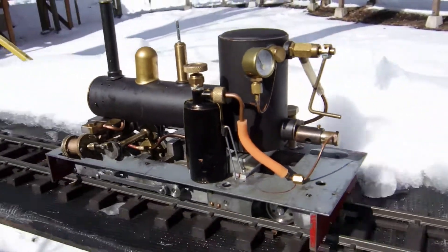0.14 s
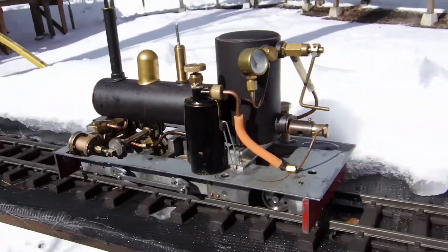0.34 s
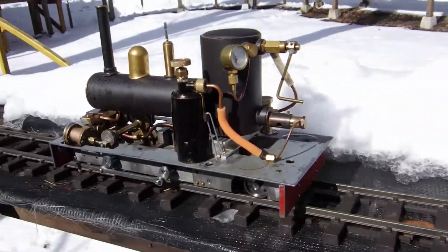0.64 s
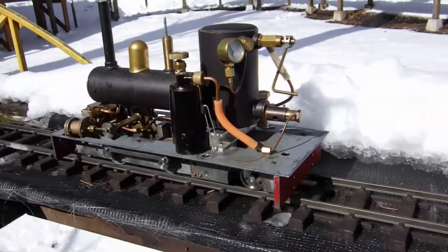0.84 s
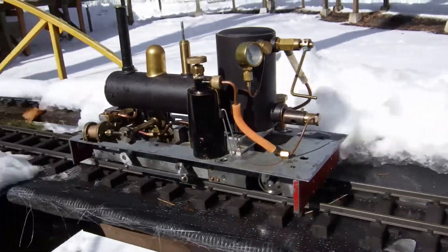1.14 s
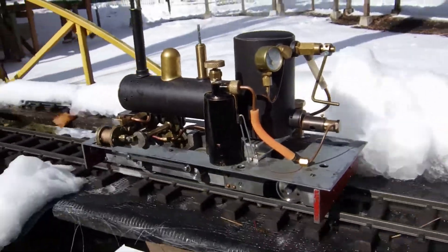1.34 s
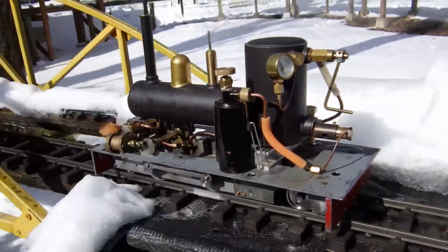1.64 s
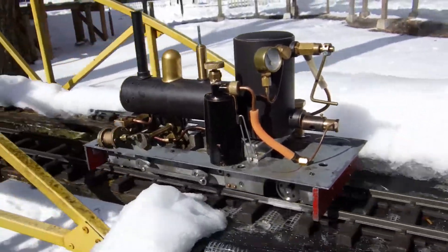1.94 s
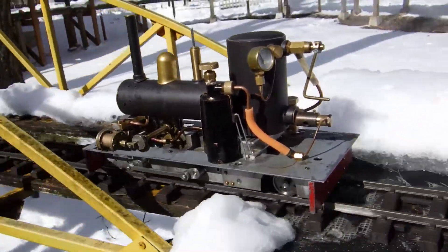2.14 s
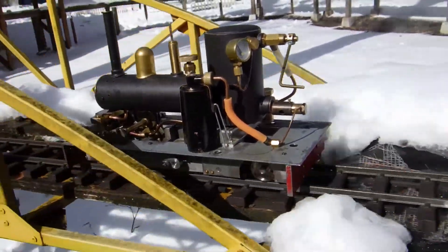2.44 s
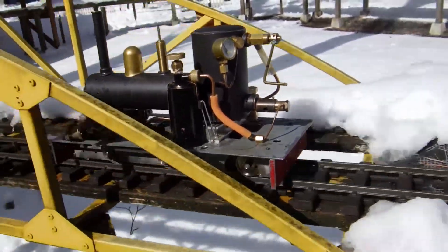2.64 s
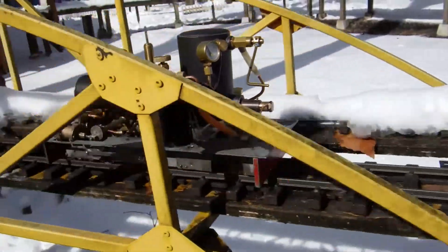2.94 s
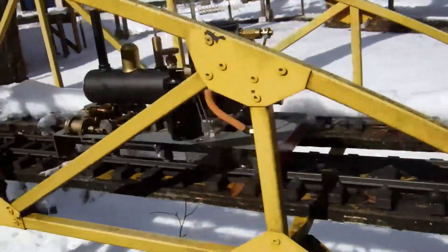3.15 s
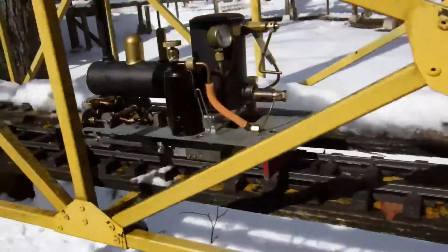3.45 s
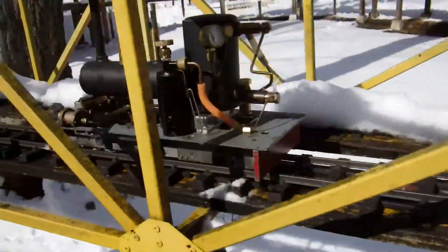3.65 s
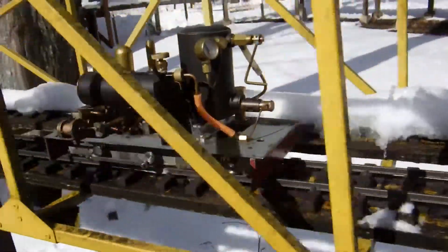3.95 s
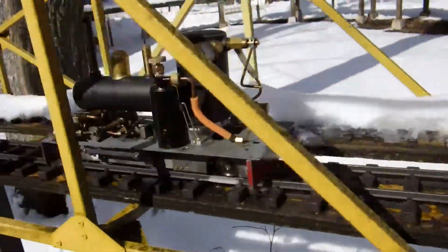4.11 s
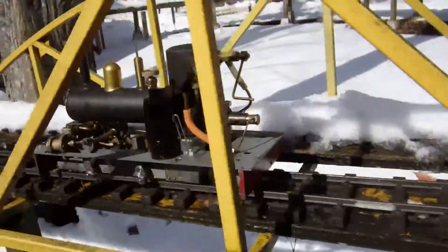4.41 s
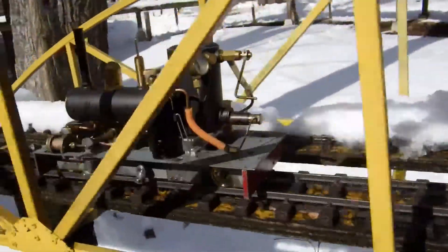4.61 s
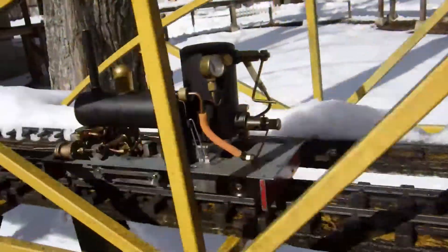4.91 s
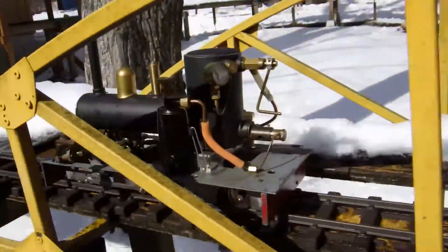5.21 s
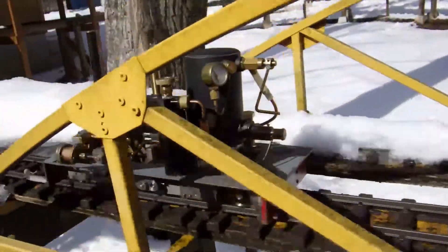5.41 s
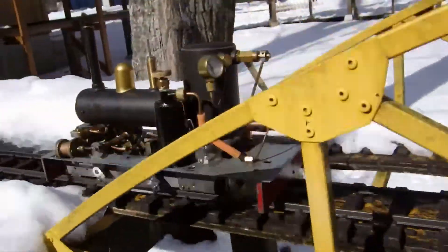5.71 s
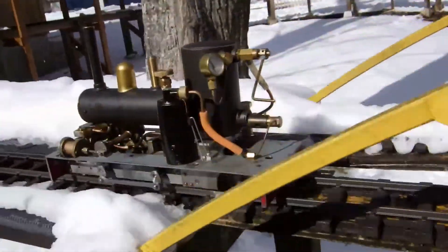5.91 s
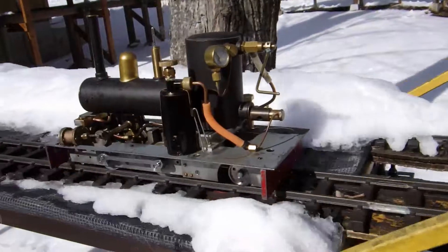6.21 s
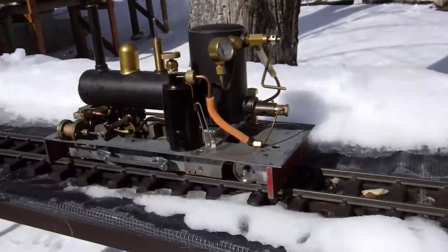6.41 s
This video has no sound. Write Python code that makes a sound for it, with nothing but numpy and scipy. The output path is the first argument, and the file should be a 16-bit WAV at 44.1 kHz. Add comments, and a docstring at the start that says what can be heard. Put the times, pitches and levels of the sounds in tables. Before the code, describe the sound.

Continuous mid-pitched roar from a small burner, blended with rolling whirr and a thin steam leak. Crisp, airy chuffs and valve wheezes form a regular rhythm that accelerates until the middle, then holds fast. Light mechanical knocks and rough creaks clatter on top. Several hard clicks snap right at the microphone, strongest late, the sound briefly dipping afterwards. Close, dry, outdoors, barely any wind; the engine never stops.

```python
"""A burner and rolling wheels roar as a small steam locomotive gathers speed, a hand-held camera close by.
Resonances shape noise into roar and hum; a valve wheezes with a sinking whistle; steam leaks steadily,
puffs once a turn and spits at two points of it. Rods knock, and the camera housing creaks and clicks as
slips and impacts set off its rings. Wind buffets faintly; the housing cuts notches in everything, and
its limiter ducks just after strong, treble-weighted peaks."""
import sys
import numpy as np
from scipy.fft import rfft, irfft, next_fast_len
from scipy.io import wavfile
from scipy.ndimage import uniform_filter1d, map_coordinates

SR = 44100
rng = np.random.default_rng(int(sys.argv[2]) if len(sys.argv) > 2 else 0)


def inscribe(sig):
    """Save sig as 16-bit PCM at rate SR to the path in sys.argv[1].

    A 1-D sig is mono; a 2-D sig holds one channel per row.
    Samples are clipped to [-1, 1] before scaling.
    """
    pcm = np.round(np.clip(np.atleast_2d(sig).T, -1, 1) * 32767)
    wavfile.write(sys.argv[1], SR, pcm.astype(np.int16))


N = 289558

# Roar levels over time: start_s [s], flue_tone_db, flame_db, wheel_whirr_db, hum_db [dB]
ROAR_LEVELS = [(0, -31, -28, -29.5, -37), (.05, -24.5, -27.5, -30.5, -39), (.6, -27.5, -26.5, -30, -39.5),
               (.8, -25, -26, -27.5, -37.5), (1.25, -26, -26, -30, -38.5), (1.5, -25, -23, -28, -34),
               (1.67, -29.5, -27, -31.5, -37.5), (1.81, -20.5, -24, -30.5, -34.5),
               (1.96, -21, -25.5, -29.5, -35.5), (2.3, -21.5, -26, -34.5, -37.5),
               (2.7, -23, -27.5, -31, -40), (3.5, -21, -26, -30.5, -38.5), (4.2, -22, -26.5, -31, -38),
               (4.55, -22.5, -27, -32, -38.5), (4.85, -20, -27, -29, -38.5), (5.3, -21.5, -26, -30, -40.5),
               (5.7, -19.5, -27.5, -30, -36), (6.2, -21.5, -24, -28.5, -37.5),
               (6.57, -22.5, -28.5, -30.5, -40)]
# Broad flame spectrum: frequency_hz [Hz], density_db [relative dB per Hz]
FLAME_SPECTRUM = [(250, -58), (500, -16), (700, -10), (1150, -14.5), (1500, -22.5), (1900, -29),
                  (3000, -43)]
# Flue resonances, before squaring: centre_hz [Hz], width_hz [Hz], level_db [relative dB]
FLUE_MODES = [(946, 69, -1), (868, 147, -1.5), (968, 297, -3.5)]
# Wheel resonances, before the power 1.52: centre_hz [Hz], width_hz [Hz], level_db [relative dB]
WHIRR_MODES = [(2011, 330, 1.5), (1470, 490, -4), (2460, 106, -5.5)]
# Frame resonances: centre_hz [Hz], width_hz [Hz], level_db [relative dB]
HUM_MODES = [(310, 26, 0), (333, 90, -7), (457, 105, -5)]


def roar():
    """Resonance of noise: the flame roars and sounds the flue; wheels whirr and the frame hums."""
    tone_db, flame_db, whirr_db, hum_db = curves(ROAR_LEVELS)
    tone = noise(lambda f: peaks(FLUE_MODES)(f) ** 2 * dull(f))
    flame = noise(shape(FLAME_SPECTRUM))
    whirr = noise(lambda f: peaks(WHIRR_MODES)(f) ** 1.52 * dull(f))
    low_cut = lambda f: (f / 270) ** 8 / (1 + (f / 270) ** 8)
    hum = noise(lambda f: peaks(HUM_MODES)(f) * low_cut(f) * dull(f))
    flutter = wobble(30)  # shared by flame and flue
    tone = amp(tone_db + 1.3 * flutter + 0.27 * wobble(8)) * tone
    flame = amp(flame_db + 0.72 * flutter + 0.36 * wobble(8)) * flame
    whirr = amp(whirr_db + 0.65 * wobble(25) + 0.82 * wobble(8)) * whirr
    return tone + flame + whirr + amp(hum_db + 0.89 * wobble(9.3)) * hum


# Leak levels over time: start_s [s], sizzle_db, hiss_db, breathy_band_db [dB]
LEAK_LEVELS = [(0, -52, -61, -52), (.6, -48.5, -56.5, -51), (1.0, -47.5, -55.5, -44),
               (1.6, -49.5, -58.5, -50), (2.05, -45.5, -55, -47), (2.4, -48, -57.5, -48),
               (3.2, -48, -56, -45), (3.8, -46, -54, -44), (4.5, -48, -58.5, -42.5), (4.9, -49, -58, -42.5),
               (5.2, -47.5, -57, -42), (5.8, -48.5, -57, -42.5), (6.57, -48.5, -56.5, -44)]
# Leak spectra, sizzle and hiss: frequency_hz [Hz], density_db [relative dB per Hz]
SIZZLE_SPECTRUM = [(4500, -19), (5400, 11.5), (6800, 12), (8000, 5.5), (9000, 4), (10000, -30)]
HISS_SPECTRUM = [(6000, -25), (9000, 0), (10500, 0), (12000, -4), (13000, -3), (15000, -5), (15700, -9),
                 (15860, -18)]
# Puff spectra, body and treble: frequency_hz [Hz], density_db [relative dB per Hz]
PUFF_SPECTRUM = [(1500, -40), (2700, 2.5), (4500, 14), (5600, 1), (8500, 3.5), (9300, -0.5), (10400, 3.5),
                 (12000, -5)]
PUFF_TREBLE_SPECTRUM = [(11500, -12), (12900, 1), (13700, -3), (14600, 0), (15300, -5), (15850, -16)]
# Spit spectrum: frequency_hz [Hz], density_db [relative dB per Hz]
SPIT_SPECTRUM = [(5000, -28), (7500, 8), (10500, 0.5), (12000, -4), (15000, -5), (15850, -14)]
# Wheel turns, also timing wheeze and rattle: puff_s [s], puff_db, puff_treble_db, first_spit_db,
# second_spit_db, out_stroke_wheeze_db, back_stroke_wheeze_db [dB], spit_delay_ms [ms]
WHEEL_TURNS = [(-0.068, -35.5, -50, -44, -57, -33, -35.5, -8),
               (0.2528, -34.5, -50.5, -43, -47, -29.5, -40, -7), (0.567, -32, -46, -41, -41, -34, -32, 4),
               (0.878, -34, -46.5, -46, -38, -32, -35.5, 4), (1.1937, -31, -45, -40, -42, -30.5, -34.5, 0),
               (1.503, -30.5, -47, -39, -40, -28, -33.5, 1), (1.7865, -32.5, -47, -40, -44, -35, -36.5, 4),
               (2.0573, -32, -46, -41, -42, -28.0, -30.0, 10),
               (2.3092, -32, -48, -43, -39, -30.5, -31.5, 3), (2.5436, -33.5, -46, -47, -50, -31, -33, 0),
               (2.7547, -33, -44.5, -57, -49, -27, -29.5, 0), (2.957, -35.5, -47, -57, -44, -33, -36.5, 3),
               (3.1455, -32, -43.5, -49, -39, -34.0, -34.5, 1),
               (3.34, -31.5, -44, -42, -44, -33.5, -32.5, -5),
               (3.523, -29.5, -41.5, -49, -36, -30, -30.0, -2), (3.704, -31, -40, -49, -39, -32, -32, 4),
               (3.88, -31.5, -40, -49, -39, -30.5, -32.0, -1), (4.0505, -29, -41, -47, -47, -31.0, -30, -1),
               (4.2098, -34.0, -41, -54, -53, -32.5, -31.0, -2),
               (4.375, -34.5, -43, -49, -49, -35, -34.5, -1), (4.538, -35, -43, -49, -55, -34, -33.5, -2),
               (4.6994, -35, -44, -51, -45, -33.5, -35, -2), (4.86, -33.5, -43, -46, -52, -35.5, -35, 0),
               (5.0172, -34.5, -46.5, -57, -53, -38, -33, 1), (5.1786, -32, -41, -58, -41, -34, -38.5, 0),
               (5.34, -32, -46, -57, -56, -36.5, -37.5, -10), (5.4953, -39, -55, -54.5, -52, -37, -36, 2),
               (5.6555, -32.0, -42.5, -54, -54, -35.5, -34.5, 0),
               (5.818, -30.5, -41, -55, -38, -38, -33, -4),
               (5.9833, -31.5, -43.5, -40, -45, -34.5, -35.5, -1),
               (6.1543, -31.5, -43, -49, -49, -33.5, -32.5, -1), (6.323, -35, -40, -57, -43, -37, -37.5, 0),
               (6.4929, -34, -41.5, -42, -57, -39.0, -38.0, 1)]
# Nominal places of the two spits: turn_share [share of a turn]
SPIT_PLACES = [.285, .79]
# Spits off the beat: start_s [s], peak_db [dB]
STRAY_SPIT_EVENTS = [(.077, -41), (.097, -46), (.392, -47), (.785, -43), (.934, -49), (1.9654, -46),
                     (2.6229, -41), (4.3098, -49), (6.2437, -47)]
PORT_OPEN = .128  # share of a turn
BREATHY_LIFT_DB = 5  # raised cyclically around the first spit and half a turn later


def steam():
    """Turbulent jet noise: a steady leak, one gated puff a turn while the port is open, and short spits."""
    t = np.arange(SR // 8) / SR
    body, treble, spits = np.zeros((3, N + 2 * SR))
    spit = np.sqrt(t / .0022) * np.exp(.5 - t / .0044)  # peaks at 1 after 2.2 ms
    for row, turn in zip(WHEEL_TURNS, np.diff(turn_edges())):
        s, puff_db, treble_db, *spit_levels = row[:5]
        length = PORT_OPEN * turn
        opens = 1 / (1 + np.exp((.003 - t) / .0008))
        shuts = 1 / (1 + np.exp((t - .004 - length) / .002))
        opening = amp(-3 * t / length) * opens * shuts  # sags 3 dB while open
        add(body, s - .004, amp(puff_db) * opening)
        add(treble, s - .004, amp(treble_db) * opening)
        for at, size_db in zip(SPIT_PLACES, spit_levels):
            add(spits, s + at * turn + row[7] * 1e-3, amp(size_db) * spit)
    for s, db in STRAY_SPIT_EVENTS:
        add(spits, s, amp(db) * spit)
    body, treble, spits = (track[SR:SR + N] for track in (body, treble, spits))

    sizzle_db, hiss_db, breathy_db = curves(LEAK_LEVELS)
    breathy_db = breathy_db + BREATHY_LIFT_DB * np.cos(2 * np.pi * (turns() - SPIT_PLACES[0])) ** 20
    sizzle = amp(sizzle_db + 1.3 * wobble(20) + 2.2 * wobble(70)) * noise(shape(SIZZLE_SPECTRUM))
    hiss = amp(hiss_db + 1.4 * wobble(40)) * noise(shape(HISS_SPECTRUM))
    breath = noise(lambda f: ring(3850, 420)(f) ** 2 * dull(f))
    leak = sizzle + hiss + amp(breathy_db + 2.6 * wobble(25)) * breath
    puffs = body * noise(shape(PUFF_SPECTRUM)) + treble * noise(shape(PUFF_TREBLE_SPECTRUM))
    flicker = amp(1.3 * wobble(140) + 1.1 * wobble(600))
    return leak + flicker * puffs + spits * noise(shape(SPIT_SPECTRUM))


# Whistle within the wheeze: start_s [s], whistle_share [0-1 of power, before its rise],
# puff_pitch_hz [Hz], turn_end_pitch_hz [Hz]
WHISTLE_COURSE = [(0, 0.4, 4640, 4310), (1.15, 0.4, 4700, 4235), (1.7, 0.63, 4680, 4260),
                  (2.05, 0.45, 4634, 4240), (2.5, 0.6, 4500, 4226), (2.9, 0.9, 4534, 4260),
                  (3.2, 0.23, 4588, 4384), (3.7, 0.56, 4720, 4510), (4.2, 0.62, 4742, 4570),
                  (5, 0.06, 4794, 4540), (6.57, 0, 4780, 4550)]
# Broad valve hiss, before squaring: centre_hz [Hz], width_hz [Hz], level_db [relative dB]
VALVE_MODES = [(4350, 350, -0.5), (4693, 490, -0.5)]
WHISTLE_RISE = 0.084  # time constant of its build-up after the puff, share of a turn


def wheeze():
    """Flow noise at a valve face: a broad hiss and a fuzzy whistle that sinks each turn as pressure falls."""
    share, start_hz, end_hz = curves(WHISTLE_COURSE)
    share = np.clip(share, 0, 1)
    turn = turns() % 1
    stroke_db = np.array(WHEEL_TURNS)[:, 5:7].ravel()
    db = uniform_filter1d(stroke_db[(2 * turns()).astype(int)], size=600)  # one level a stroke
    pitch_hz = end_hz + (start_hz - end_hz) * (1 - turn) + 45 * wobble(25)
    phase = 2 * np.pi * np.cumsum(pitch_hz) / SR
    whistle = unit(wobble(210) * np.cos(phase) + wobble(210) * np.sin(phase))  # narrow noise about the pitch
    whistle = (1 - np.exp(-turn / WHISTLE_RISE)) * whistle
    broad = noise(lambda f: peaks(VALVE_MODES)(f) ** 2 * dull(f))
    return amp(db + 0.8 * wobble(30)) * (np.sqrt(1 - share) * broad + np.sqrt(share) * whistle)


# Housing creaks: start_s [s], length_s [s], lower_ring_db, upper_ring_db [dB]
CREAK_EVENTS = [(0.035, 0.12, -30, -38.5), (0.353, 0.17, -27, -39), (0.673, 0.025, -37, -46),
                (0.751, 0.11, -23, -34.5), (0.88, 0.094, -33.5, -40), (0.987, 0.18, -25.5, -38),
                (1.186, 0.067, -34, -53), (1.592, 0.039, -27.5, -48), (1.754, 0.071, -22.5, -44),
                (1.893, 0.022, -30, -42), (1.946, 0.1, -21.5, -38.5), (2.136, 0.039, -25.5, -39),
                (2.606, 0.087, -27.5, -36.5), (2.883, 0.032, -23.5, -39), (3.12, 0.099, -27.5, -39),
                (3.251, 0.2, -32.5, -42.5), (3.619, 0.084, -24.5, -35.5), (3.72, 0.1, -33, -49),
                (4.293, 0.039, -29.5, -39), (4.611, 0.027, -32, -56), (4.948, 0.018, -19, -27.5),
                (5.641, 0.035, -27, -49)]
# Rod knocks: turn_share [share of a turn], width [turns], lower_ring_db, upper_ring_db [dB before scatter]
ROD_KNOCKS = [(.02, 0.029, -38.5, -48), (.38, 0.059, -38, -43.5), (.58, .04, -35.5, -49.5),
              (.8, .03, -37.5, -42.5)]
# The two housing rings, one pass: centre_hz [Hz], width_hz [Hz]
HOUSING_RINGS = [(2720, 266), (6290, 520)]
# Bright edge of the slips: frequency_hz [Hz], density_db [relative dB per Hz]
GRIT_SPECTRUM = [(6800, -17), (8300, 8), (9300, -7), (10500, -8), (11500, -18), (15000, -16)]
CREAK_RISE_S, CREAK_FALL_S = .002, .0095
CREAK_FADE_DB = 1  # over the whole length of a creak
KNOCK_SCATTER_DB = 2.5


def creak():
    """Stick-slip excitation: uneven, clumped slips drive both housing rings and leave a bright edge."""
    t, turn = np.arange(N) / SR, turns()
    power = amp([-40, -56.5])[:, None] ** 2 * np.ones(N)  # constant bed of the lower and upper ring
    for s, length, *db in CREAK_EVENTS:
        rise = 1 / (1 + np.exp(np.clip((s - t) / CREAK_RISE_S, -50, 50)))
        fall = 1 / (1 + np.exp(np.clip((t - s - length) / CREAK_FALL_S, -50, 50)))
        fade = amp(-CREAK_FADE_DB * np.clip((t - s) / length, 0, 1))
        power = power + (amp(db)[:, None] * rise * fall * fade) ** 2
    for at, width, *db in ROD_KNOCKS:
        nearest = np.round(turn - at)
        scatter = amp(KNOCK_SCATTER_DB * rng.standard_normal(len(WHEEL_TURNS) + 2))
        bump = np.exp(-((turn - at - nearest) / width) ** 2 / 2)
        power = power + (amp(db)[:, None] * scatter[nearest.astype(int)] * bump) ** 2
    slips = rng.standard_normal((3, N)) * amp(1.9 * wobble(90))  # clumps
    slips = slips * (0.29 + (rng.random(N) < .02) * 3.9)  # a few large slips among small ones
    low, high = (unit(filtered(s, lambda f: ring(*mode)(f) ** 2 * dull(f / 2)))
                 for s, mode in zip(slips, HOUSING_RINGS))
    grit = amp(-9.5) * unit(filtered(slips[2], shape(GRIT_SPECTRUM)))
    low_gain, high_gain = np.sqrt(power)
    return low_gain * low + high_gain * (high + grit)


# Housing clicks: start_s [s], crack_db, lower_ring_db, upper_ring_db, thud_db [relative dB]
CLICK_EVENTS = [(1.3718, -54.5, -17, -37, -59), (2.5109, -45, -12.5, -29, -60),
                (2.8292, -51, -17, -38, -60), (3.6289, -28, -8, -38, -41), (4.4425, -53, -15.5, -36, -60),
                (4.957, -24, -3.5, -27, -32), (4.9635, -44.5, -11, -40, -40),
                (5.1043, -51, -15, -38, -56.5), (5.1559, -55, -18, -44, -54), (5.5869, -50, -19, -36, -62),
                (6.08, -48, -14, -35, -60), (6.2605, -23, -4.5, -27, -29), (6.268, -42.5, -9, -26, -43),
                (6.4689, -55, -22, -37.5, -58.5)]


def clicks():
    """Impulse response: each click is a bright crack, two decaying housing rings and a low thud."""
    out, t = np.zeros(N + 2 * SR), np.arange(SR // 10) / SR
    (low_hz, _), (high_hz, _) = HOUSING_RINGS
    for s, crack_db, low_db, high_db, thud_db in CLICK_EVENTS:
        snap = amp(-60 * t / .005)  # falls 60 dB in 5 ms
        grain = np.convolve(rng.standard_normal(len(t)), [1, 0, -1], "same")  # strongest near 11 kHz
        crack = amp(crack_db) * snap * grain
        rings = amp(low_db - 60 * t / 0.025) * np.sin(2 * np.pi * low_hz * t) * (1 - np.exp(-t / 0.0004))
        rings += amp(high_db - 60 * t / 0.018) * np.sin(2 * np.pi * high_hz * t)
        push = t / .0006
        add(out, s, crack + rings + amp(thud_db) * push * np.exp(1 - push))
    return out[SR:SR + N]


# Wind gusts: centre_s [s], half_length_s [s],
# peak_db [dB, own level of the gust, its amplitude added to the steady wind's]
GUST_EVENTS = [(1.255, 0.16, -68), (1.5, 0.11, -72), (2.3, 0.33, -70), (1.88, 0.09, -67),
               (2.451, 0.092, -64), (3.3, 0.17, -70), (3.638, .1, -63), (4.04, 0.061, -61),
               (4.347, .06, -75), (4.801, .07, -66), (5.55, .15, -69), (6.09, .05, -70), (6.504, .1, -72)]
# Wind spectrum: frequency_hz [Hz], density_db [relative dB per Hz]
RUMBLE_SPECTRUM = [(18, -47), (30, -14), (70, -7.5), (146, -9), (209, -7), (260, -14.5), (340, -39),
                   (570, -120)]
WIND_DB, WIND_GROWS_DB = -69, 1.17  # level at first; growth a second


def wind():
    """Turbulent pressure on the microphone: faint low noise, swelling in short gusts."""
    t = np.arange(N) / SR
    gusts = sum(amp(db) * np.exp(-((t - s) / half) ** 2) for s, half, db in GUST_EVENTS)
    level = amp(WIND_DB + WIND_GROWS_DB * t) + gusts
    return level * unit(amp(1.4 * wobble(14)) * noise(shape(RUMBLE_SPECTRUM)))


def scene():
    """Superposition: the sources add."""
    return (roar() + steam() + wheeze() + creak() + clicks() + wind())[None]


# Notch centres: frequency_hz [Hz]
NOTCH_CENTRES = [3185, 4075, 5150, 5675, 7145, 8185]
# Their shapes: width_hz [Hz], floor_db [dB at the centre]
NOTCH_SHAPES = [(740, -33), (172, -24), (477, -41), (365, -25), (358, -28), (70, -18)]


def housing(f):
    """Cavity absorption: cavities around the microphone cut narrow notches in the response."""
    return np.prod([1 - (1 - amp(db)) * ring(c, w)(f)
                    for c, (w, db) in zip(NOTCH_CENTRES, NOTCH_SHAPES)], axis=0)


def limited(x, top_db, release_db, treble_hz):
    """Gain control: drops just after a treble-weighted peak passes the top, climbs release_db a second."""
    weighted = filtered(x, lambda hz: hz ** 2 / (hz ** 2 + treble_hz ** 2))
    need = np.minimum(0, top_db - 20 * np.log10(np.abs(weighted) + 1e-9))
    climb = release_db * np.arange(N) / SR
    held = np.minimum(0, climb + np.minimum.accumulate(need - climb, axis=-1))
    return x * amp(uniform_filter1d(held, size=201, origin=90))  # smoothed mostly over the past: it lags


CEILING, TOP_HZ = .52, 15870  # amplitude where peaks round off; upper band edge


def record(dry):
    """A transmission chain: housing colour, limiter, soft saturation, band limit."""
    x = limited(filtered(dry, housing), top_db=-18.0, release_db=11.5, treble_hz=2925)
    x = x / (1 + np.abs(x / CEILING) ** 8) ** (1 / 8)
    return filtered(x, lambda hz: hz < TOP_HZ)


def turn_edges():
    """Periodic motion: start of each turn in seconds, the last turn as long as the one before."""
    starts = np.array(WHEEL_TURNS)[:, 0]
    return np.r_[starts, 2 * starts[-1] - starts[-2]]


def turns():
    """Rotational phase: wheel turns counted from the first puff, one value per sample."""
    edges = turn_edges()
    return np.interp(np.arange(N) / SR, edges, np.arange(len(edges)))


def add(track, s, event):
    """Superposition: lays an event into a track that starts one second early."""
    track[round((s + 1) * SR):][:len(event)] += event


def amp(db):
    """Decibel law: level to amplitude."""
    return 10 ** (np.asarray(db) / 20)


def unit(x):
    """Normalisation to rms 1."""
    return x / np.sqrt(np.mean(x ** 2) + 1e-20)


def curves(rows):
    """Linear interpolation: one value per sample for each column after the time."""
    s, *cols = np.transpose(rows)
    return [np.interp(np.arange(N) / SR, s, c) for c in cols]


def wobble(rate):
    """Slow random modulation: a smooth curve through rate random knots a second."""
    return map_coordinates(rng.standard_normal(int(N * rate / SR) + 4), [np.arange(N) * rate / SR])


def filtered(x, response):
    """Linear filtering: x times a complex response of frequency."""
    m = next_fast_len(N + SR // 2)
    return irfft(rfft(x, m) * response(np.fft.rfftfreq(m, 1 / SR)), m)[..., :N]


def shape(points):
    """Spectral envelope: gain of (Hz, dB) points on a log axis, -120 dB outside them."""
    f, db = np.transpose(points)
    return lambda hz: amp(np.interp(np.log(hz + 1), np.log(f + 1), db, -120, -120))


def ring(centre_hz, width_hz):
    """Damped oscillator: one causal resonance, gain 1 at its centre."""
    return lambda f: 1j * f * width_hz / (centre_hz ** 2 - f * f + 1j * f * width_hz)


def peaks(modes):
    """Incoherent summation: magnitude of resonances that add in power."""
    return lambda f: np.sqrt(sum(np.abs(amp(db) * ring(c, w)(f)) ** 2 for c, w, db in modes))


def dull(f):
    """Low-pass roll-off: far skirts of the resonances die out in the treble."""
    return 1 / (1 + (f / 6000) ** 6)


def noise(response):
    """Random excitation: fresh coloured noise of rms 1."""
    return unit(filtered(rng.standard_normal(N), response))


dry = scene()
out = record(dry)
inscribe(out)
```